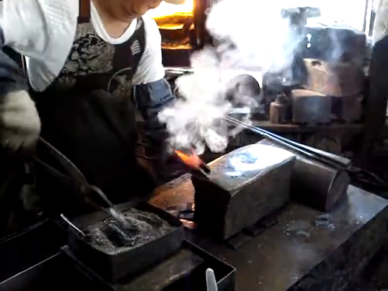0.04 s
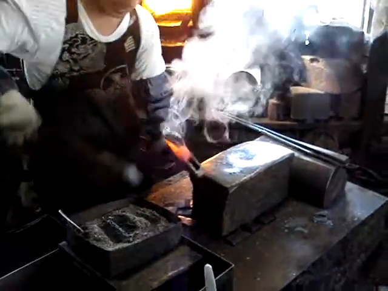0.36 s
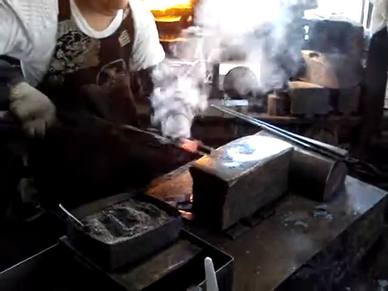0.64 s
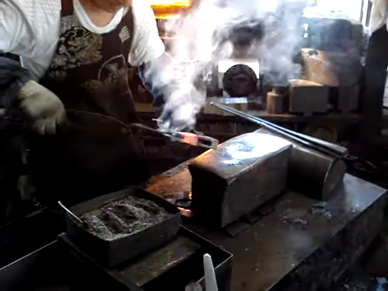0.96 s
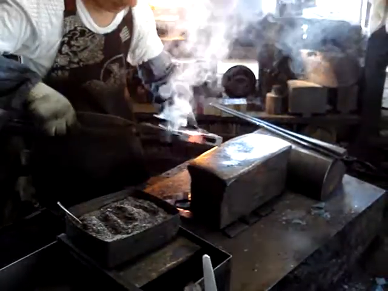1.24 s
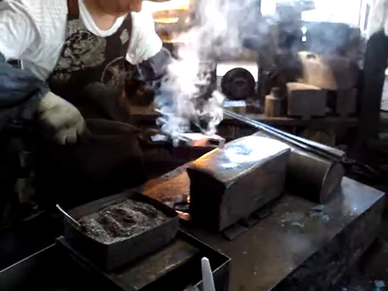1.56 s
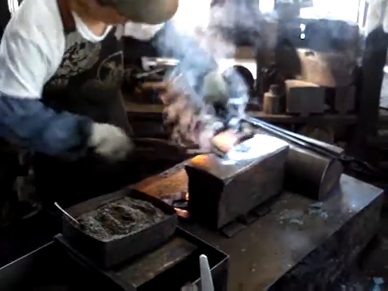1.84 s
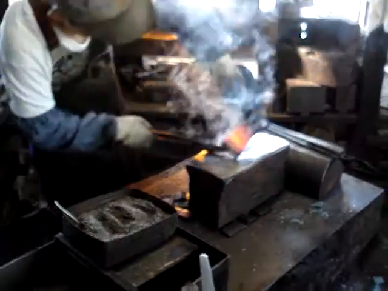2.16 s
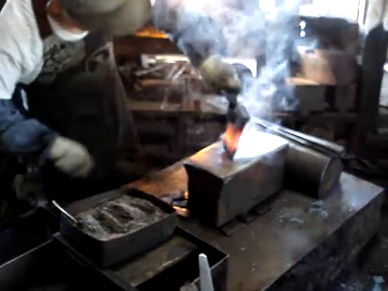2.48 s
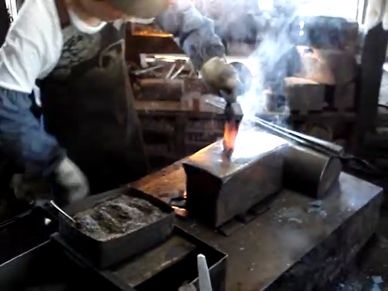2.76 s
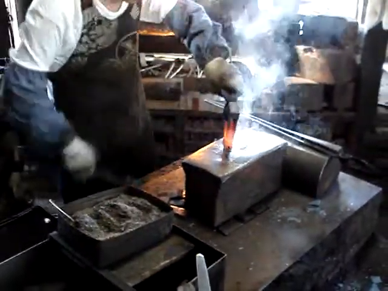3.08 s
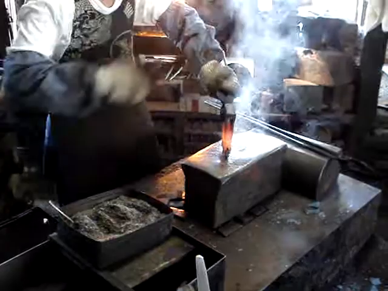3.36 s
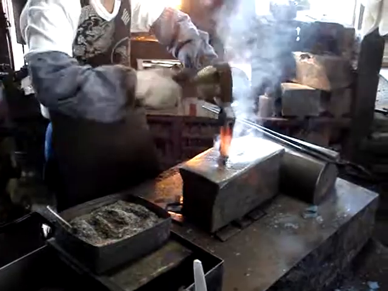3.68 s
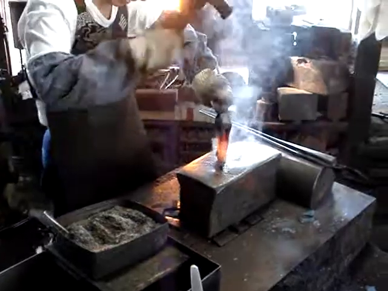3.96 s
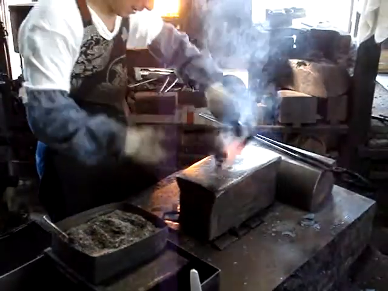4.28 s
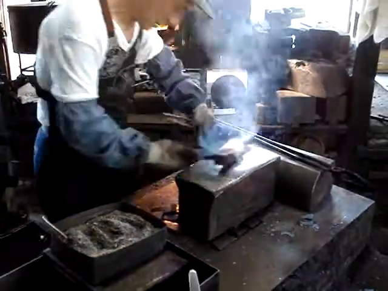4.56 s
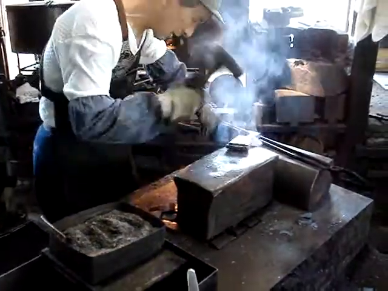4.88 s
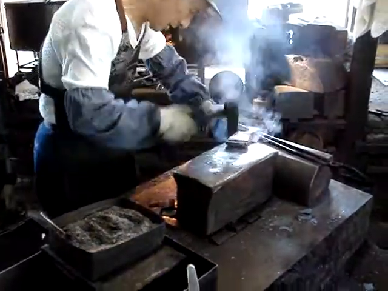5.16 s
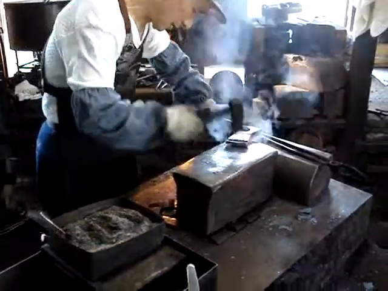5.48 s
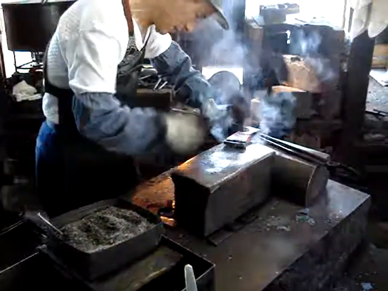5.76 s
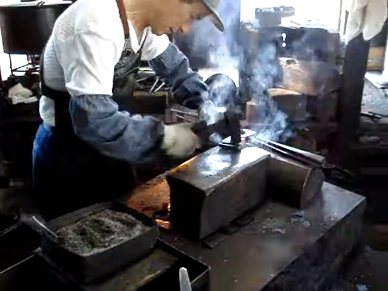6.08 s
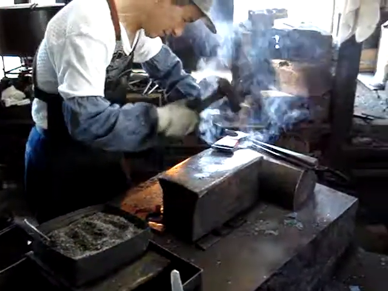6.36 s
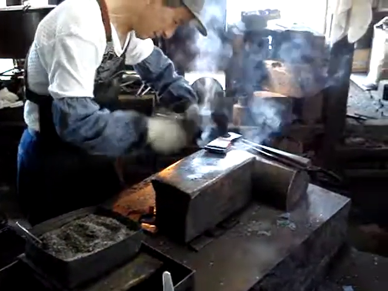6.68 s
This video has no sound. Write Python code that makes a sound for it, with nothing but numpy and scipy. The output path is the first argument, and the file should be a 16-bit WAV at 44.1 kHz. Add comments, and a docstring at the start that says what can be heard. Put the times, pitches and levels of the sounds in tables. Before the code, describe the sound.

A blower-fed forge roars from start to finish in a small workshop: a low, fluttering hum and turbulent drone that swell slightly, with a hiss of air above. Faint dry ticks come from the hot steel, scattered through the first 2.5 seconds and occasionally later. At about 2.7 seconds a dropped iron tool lands with a quick, chattering clatter. A hammer strikes hot steel on an anvil at 3.6 and 4.1 seconds, each blow a sharp, deadened crack with a short metallic ring. Around 4.4 seconds the tongs knock briefly as the piece is turned. From 5.1 to 6.8 seconds come six lighter, even blows, about three a second, each with an anvil thud and a small clank. Everything is heard on one microphone, with short reflections from close walls and the forge rumbling underneath.

```python
"""A blower-fed forge roars in a small workshop, heard on one microphone with the walls close around.
Its flame pulses about 56 times a second over a turbulent drone and a hiss of air; hot scale ticks faintly.
A dropped tool clatters. The smith strikes the upright billet twice on a block anvil, turns it in the
tongs, then taps it flat. A limiter on the microphone signal holds the peaks down."""
import sys
import numpy as np
from scipy import signal
from scipy.fft import rfft, irfft
from scipy.io import wavfile
from scipy.ndimage import uniform_filter1d, minimum_filter1d

SR = 44100
rng = np.random.default_rng(int(sys.argv[2]) if len(sys.argv) > 2 else 0)


def generate_wav(signal):
    """Clip the signal to [-1, 1] and save it as 16-bit WAV at the path in sys.argv[1]."""
    frames = np.transpose(np.atleast_2d(signal))
    scaled = np.clip(frames, -1, 1) * 32767
    pcm = np.round(scaled).astype(np.int16)
    wavfile.write(sys.argv[1], SR, pcm)


N = 301203
TIME = np.arange(N) / SR
FREQS = np.fft.rfftfreq(N, 1 / SR)
RING_TIME = np.arange(SR // 3) / SR


def gain_of(db):
    """Decibels to amplitude."""
    return 10 ** (np.asarray(db) / 20)


def unit_rms(x):
    """Scales to rms 1."""
    return x / np.sqrt(np.mean(x ** 2) + 1e-20)


def value_at(points, hz):
    """Interpolates (frequency, value) points on a log-frequency axis."""
    f, value = np.transpose(points)
    return np.interp(np.log(hz + 1), np.log(f + 1), value)


def curves(rows):
    """Each column after the time column as a curve over the scene."""
    times, *columns = np.transpose(rows)
    return [np.interp(TIME, times, column) for column in columns]


def add(mix, start_s, sound):
    """Mixes a sound in at a time."""
    part = mix[round(start_s * SR):][:len(sound)]
    part += sound[:len(part)]


def coloured(x, gain):
    """Filters by a gain per frequency, to rms 1."""
    return unit_rms(irfft(rfft(x) * gain, N))


def resonances(modes):
    """Gain of a set of steep-sided resonances."""
    return np.sqrt(sum(gain_of(db) ** 2 / (1 + (2 * (FREQS - hz) / width) ** 4)
                       for hz, width, db in modes))


def waver(rate_hz):
    """Slow random wander of rms 1."""
    return coloured(rng.standard_normal(N), 1 / (1 + (FREQS / rate_hz) ** 4))


def turbulence(noise, modes, level_db, steady_s):
    """Noise that flares with the draught, rung through resonances that smooth each flare."""
    half_filter = np.sqrt(resonances(modes))  # met twice: in the firebox and on the way out
    rumble = coloured(noise, half_filter)
    flutter = rumble / np.sqrt(uniform_filter1d(rumble ** 2, int(steady_s * SR)) + 1e-3)  # swells evened
    level = gain_of(level_db)
    return np.sqrt(np.mean(level ** 2)) * coloured(level * flutter, half_filter)


def forge(boom_db=-1, roar_db=-27, rush_db=-33, puff_depth=0.15, flicker_db=1.5, waver_hz=7.6):
    """The flame pulses in its firebox; each pulse drives a puff of turbulence through the resonances."""
    # pulse rate of the flame: t/s, f/Hz
    pulse_rate = [(0, 55.6), (.35, 55.9), (.55, 55.1), (.8, 56.3), (1.2, 56), (1.5, 55.4), (2.12, 55.7),
                  (2.25, 58), (2.55, 56.8), (2.9, 56.4), (4.5, 56.6), (5.1, 56.5), (5.45, 55.4),
                  (5.65, 55.9), (5.9, 55.5), (6.55, 55.2), (6.83, 56.6)]
    # its harmonics: level at the resting rate/dB, gain when pulsing fast/dB, random waver/dB
    partials = [(-29, 1.9, 0.84), (-23.5, -4, 1.5), (-32, -1.5, 4)]
    # slow swells of the draught: t/s, boom level/dB, drone level/dB
    draught = [(0.0, -23.5, -22), (0.64, -24.5, -21.0), (0.88, -23.5, -24), (1.16, -27, -23),
               (1.52, -23, -17.5), (1.92, -24, -24.5), (2.4, -18.5, -18), (2.52, -26, -21.0),
               (3.2, -19.5, -21), (3.4, -28.5, -23.5), (3.8, -23.5, -18.5), (4.12, -26.5, -26),
               (4.36, -21.5, -20), (4.88, -30.5, -26), (5.2, -27.5, -20), (6.2, -21.0, -22),
               (6.4, -26.0, -19.5), (6.82, -21, -24.5)]
    # low resonances of firebox and flue: f/Hz, width/Hz, relative level/dB
    boom_modes = [(170.5, 13.8, 21), (152, 20, -28)]
    drone_modes = [(216.5, 13.8, -1.5), (240.2, 23, -3), (273.2, 21.8, 2), (298.2, 14.3, -1)]
    # resonances of forge and workshop in the steady roar: f/Hz, width/Hz, relative level/dB
    roar_modes = [(106.7, 19, 2), (330.2, 10.7, -4.5), (362, 9, -13.5), (400.7, 25, -9), (443, 29.5, -7),
                  (499, 29.4, -8.5), (547.3, 26, -10), (582, 22, -11.5), (622.2, 20, -9.5),
                  (654, 35, -15.5), (837, 90, -35), (936, 23, -16.5), (1118, 32.6, -16.5),
                  (1825, 21, -27.5), (2117, 28, -30), (2224, 100, -38.5), (3114, 70, -41), (7300, 87, -50)]
    # spectrum of the air blast: f/Hz, relative level/dB
    rush_spectrum = [(20, -20.5), (45, -9.5), (80, -5), (350, -4.5), (600, -7), (800, -5), (1100, -12),
                     (1300, -18.5), (1600, -23), (2300, -24), (3500, -33), (5200, -34.5), (6800, -32.5),
                     (9900, -44.5)]
    rest_hz, switch_hz = 56, 0.55
    rate = curves(pulse_rate)[0]
    phase = 2 * np.pi * np.cumsum(rate) / SR
    fast = np.tanh((rate - rest_hz) / switch_hz)  # +1 favours the fundamental, -1 the octave
    pulses = np.sqrt(2) * sum(gain_of(db + fast_db * fast + waver_db * waver(waver_hz)) * np.cos(k * phase)
                              for k, (db, fast_db, waver_db) in enumerate(partials, 1))
    boom_level, drone_level = curves(draught)
    puffs = rng.standard_normal((4, N)) * (1 + puff_depth * np.cos(phase))
    boom = turbulence(puffs[0], boom_modes, boom_level + boom_db, steady_s=0.069)
    drone = turbulence(puffs[1], drone_modes, drone_level + flicker_db * waver(waver_hz), steady_s=0.14)
    roar = gain_of(roar_db) * coloured(puffs[2], resonances(roar_modes))
    blast = puffs[3] + 0.3 * workshop(puffs[3])  # reflections comb the hiss into fine peaks and dips
    rush = gain_of(rush_db) * coloured(blast, gain_of(value_at(rush_spectrum, FREQS)))
    return pulses + boom + drone + roar + rush


def workshop(x, first_echo_s=0.0028, echoes_per_s=4000):
    """Near walls and benches throw dense reflections at the microphone; each band dies at its own speed."""
    # reverberation of the room: f/Hz, t60/s
    decay_times = [(200, 0.91), (1000, 0.23), (3000, 0.35), (9000, 0.28)]
    taps = rng.standard_normal(SR) * (rng.random(SR) < echoes_per_s / SR)
    hz, t, bands = signal.stft(taps, SR, nperseg=256)
    decay = gain_of(-60 * t / value_at(decay_times, hz)[:, None])
    tail = signal.istft(bands * decay, SR, nperseg=256)[1]
    tail *= np.clip(np.arange(len(tail)) / SR / first_echo_s - 1, 0, 1)
    return signal.fftconvolve(x, tail / np.linalg.norm(tail))[:N]


def scale_ticks(snap_db=1, snap_t60=0.015, spread=1.44, ping_db=-3, ping_ratio=1.18, ping_t60=0.023):
    """Tiny dry ticks with a short ping from the cooling skin of the steel; smaller flakes snap higher."""
    # scale snapping off the hot steel: t/s, level/dB, band centre f/Hz
    snaps = [(0.385, -36.5, 3800), (0.719, -39, 3860), (1.052, -52, 4500), (1.441, -41, 4200),
             (1.663, -43, 4470), (2.328, -45, 4500), (2.458, -50, 6950), (4.323, -43.5, 3800),
             (5.513, -39.5, 4200), (5.692, -44, 4000), (5.871, -44, 5000), (6.229, -44, 4000)]
    t = RING_TIME
    out = np.zeros(N)
    for start_s, db, hz in snaps:
        band = signal.butter(4, [hz / spread, hz * spread], "band", fs=SR, output="sos")
        noise = unit_rms(signal.sosfilt(band, rng.standard_normal(len(t))))
        snap = noise * gain_of(snap_db - 60 * t / snap_t60)
        ping = np.sin(2 * np.pi * hz * ping_ratio * t) * gain_of(ping_db - 60 * t / ping_t60)
        add(out, start_s, gain_of(db) * (snap + ping))
    return out


def ring(modes, pitch=1, scatter=0.011):
    """Dying modes of a struck body; the grip and the contact detune them a little each time."""
    t = RING_TIME
    detunes = 1 + scatter * rng.standard_normal(len(modes))
    return sum(gain_of(db - 60 * t / t60) * np.sin(2 * np.pi * hz * pitch * detune * t)
               * rng.choice([-1, 1]) for (hz, db, t60), detune in zip(modes, detunes))


def crack(spectrum, t60, contact_s=0.0012, attack_s=0.001):
    """Rough faces grind together while they touch, then the noise dies."""
    t = RING_TIME
    colour = gain_of(value_at(spectrum, np.fft.rfftfreq(len(t), 1 / SR)))
    grit = irfft(rfft(rng.standard_normal(len(t))) * colour, len(t))
    attack = 1 - np.exp(-t / attack_s)
    decay = gain_of(-60 * np.maximum(t - contact_s, 0) / t60)
    return unit_rms(grit) * attack * decay


def tools(crack_db=-24, ring_db=-24, tongs_hz=7790, tongs_db=-14.5, tongs_t60=0.051):
    """Loose iron chatters as it lands, and the tongs give a thin high ring."""
    # tools and tongs knocking on iron: t/s, force/dB, crack level/dB, pitch factor, chatter t60/s
    knocks = [(2.6838, -1, -1, 1.077, 0.075), (2.7424, -2.5, -2, 0.95, 0.053), (2.760, -9, 3, 1.3, 0.1),
              (2.793, -0.5, 1, 1.03, 0.08), (2.8205, -9, 11, 1, 0.027), (2.8365, 1.5, 2.5, 1.0, 0.087),
              (2.853, -11, -9, 0.88, 0.03), (2.880, -17, 12.5, 1.2, 0.091), (4.4136, -5, 1, 1.02, 0.023),
              (4.427, -10, 0, 1.2, .02), (4.4523, -13, -4, 1.03, .02), (4.4965, -11.5, 10.5, 1.0, 0.023)]
    # modes of the tools: f/Hz, level/dB, t60/s
    tool_modes = [(361, -6.5, 0.095), (475, 10, 0.029), (697, -0.5, 0.067), (869, 3, 0.054),
                  (1266, -2, 0.02), (2187, 1.5, 0.044), (2230, -5.5, 0.026), (3160, -6, .02),
                  (4000, -17, .02), (6340, -18, 0.016), (7600, -21, .03)]
    # rattle of loose iron: f/Hz, relative level/dB
    rattle_spectrum = [(150, -14), (420, 9.5), (900, 11.5), (1600, 0.5), (2300, -1), (3800, -4.5),
                       (5200, -9), (6500, -3), (8200, -10.5), (10000, -20)]
    out = np.zeros(N)
    for start_s, force_db, sharp_db, pitch, chatter_t60 in knocks:
        iron = ring(tool_modes, pitch)
        tongs = ring([(tongs_hz, tongs_db, tongs_t60)], scatter=0.002)
        chatter = gain_of(crack_db + sharp_db) * crack(rattle_spectrum, chatter_t60)
        add(out, start_s, gain_of(force_db) * (chatter + gain_of(ring_db) * (iron + tongs)))
    return out


def hammer(crack_db=-24, billet_tongs_db=-16, anvil_db=-21, head_db=-22, crack_t60=0.03):
    """Soft hot steel deadens each blow: a crack, an anvil thud, a clank of the hammer head
    and a short ring of the billet, with the thin high ring of the tongs holding it."""
    # blows: t/s, force/dB, crack level/dB, billet and tongs ring/dB, anvil thud/dB, head clank/dB
    blows = [(3.6384, -2, 5.5, -4.5, -9.5, -5.5), (4.1268, 0.5, 5, -2.5, -20, -14),
             (5.088, -12.5, 1, -10, 7, -1), (5.454, -5, 3.5, -24, 1, 0.5), (5.7964, -9, 6, -15, 5, -5.5),
             (6.133, -4, 3, -28.5, 2, 0.5), (6.4639, -9.5, 3, -21, 4, -4), (6.773, -4, 4, -17, 0, -8.5)]
    # crack of the hammer on hot steel: f/Hz, relative level/dB
    crack_spectrum = [(150, -18.5), (450, -3.5), (750, 11), (1050, 15), (1600, -3.5), (2250, -1),
                      (3600, -3.5), (5200, -7), (6600, -3.5), (8200, -12), (10000, -17)]
    # modes of the anvil and of the hammer head: f/Hz, level/dB, t60/s
    anvil_modes = [(364, 10, 0.041), (453, 2.5, .08), (472, 3, 0.045), (760, -1.5, 0.11), (915, -2, 0.13),
                   (1250, -1, 0.017)]
    head_modes = [(2003, -1, 0.033), (2200, 0.15, 0.023)]
    # modes of the billet and, in the last row, of the tongs holding it: f/Hz, level/dB, t60/s
    billet_tongs_modes = [(992, 5.5, 0.034), (1076, -4, 0.025), (1320, -22, 0.013), (2300, -4.5, .015),
                          (4440, -7, 0.011), (7830, -17.5, 0.054)]
    out = np.zeros(N)
    for start_s, force_db, sharp_db, ring_db, thud_db, clank_db in blows:
        contact = gain_of(crack_db + sharp_db) * crack(crack_spectrum, crack_t60)
        anvil = gain_of(anvil_db + thud_db) * ring(anvil_modes)
        billet_tongs = gain_of(billet_tongs_db + ring_db) * ring(billet_tongs_modes)
        head = gain_of(head_db + clank_db) * ring(head_modes)
        add(out, start_s, gain_of(force_db) * (contact + anvil + billet_tongs + head))
    return out


def scene(room_db=-3):
    """Forge, scale, tools and anvil at one microphone; knocks and blows also come back off the walls."""
    blows, knocks = hammer(), tools()
    echoes = gain_of(room_db) * (workshop(blows) + workshop(knocks))
    return (forge() + scale_ticks() + knocks + blows + echoes)[None]


def record(dry, ceiling_db=-6, recovery_db_per_s=45, cutoff_hz=9980):
    """The microphone feeds a fast peak limiter that recovers slowly, then a steep low-pass."""
    over_db = np.maximum(20 * np.log10(abs(dry[0]) + 1e-9) - ceiling_db, 0)
    recovery_db = TIME * recovery_db_per_s
    held_db = np.maximum.accumulate(over_db + recovery_db) - recovery_db
    duck_db = uniform_filter1d(minimum_filter1d(-held_db, size=80), size=80)  # eases in ahead of a peak
    soft_ends = signal.windows.tukey(N, 0.001)
    low_pass = signal.firwin(701, cutoff_hz, window=("kaiser", 9), fs=SR)
    return signal.oaconvolve(dry * gain_of(duck_db) * soft_ends, low_pass[None], "same")


dry = scene()
out = record(dry)
generate_wav(out)
```